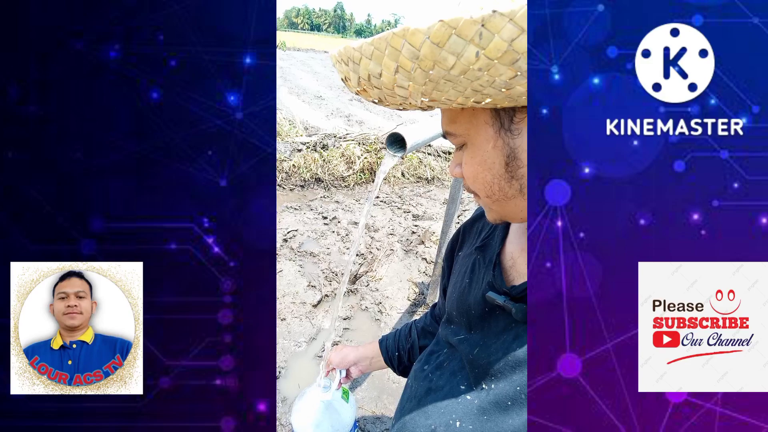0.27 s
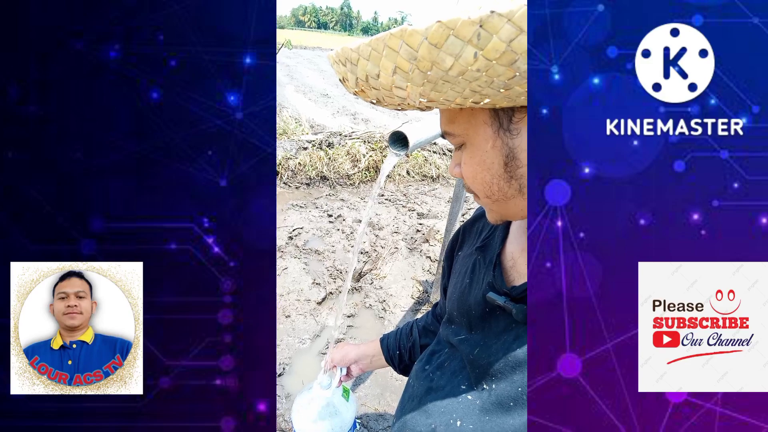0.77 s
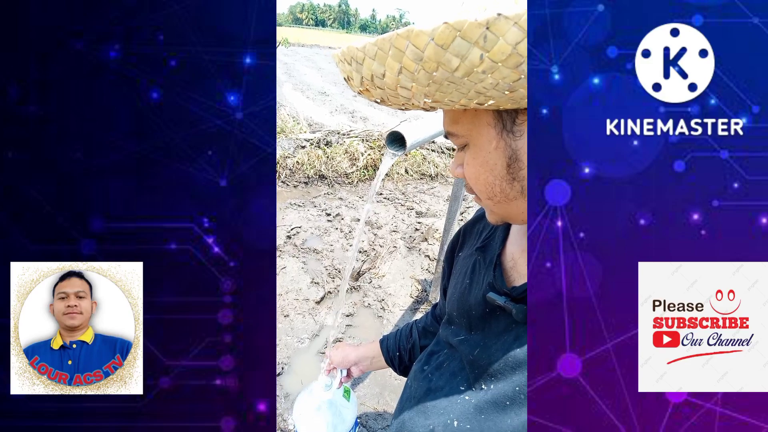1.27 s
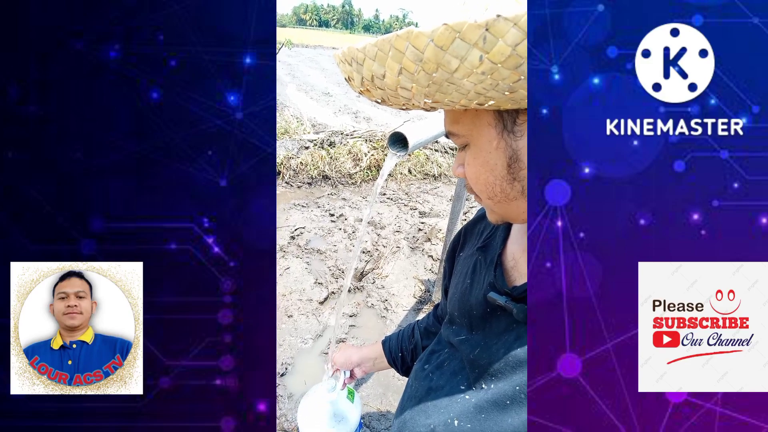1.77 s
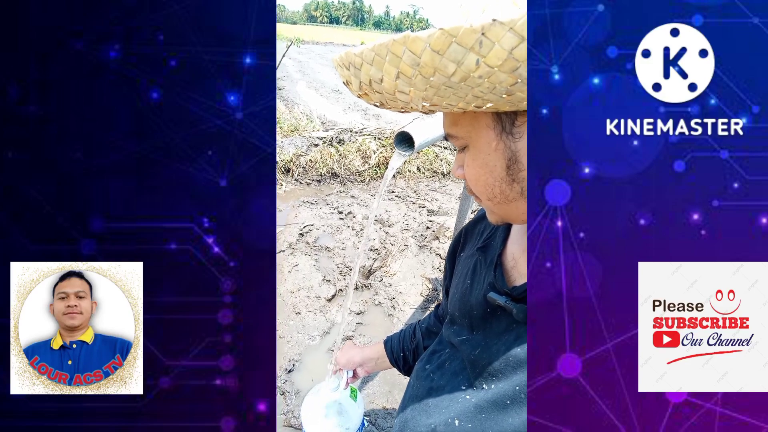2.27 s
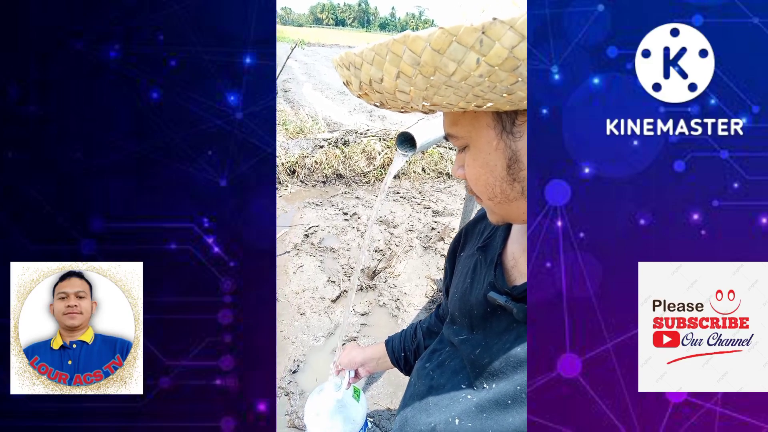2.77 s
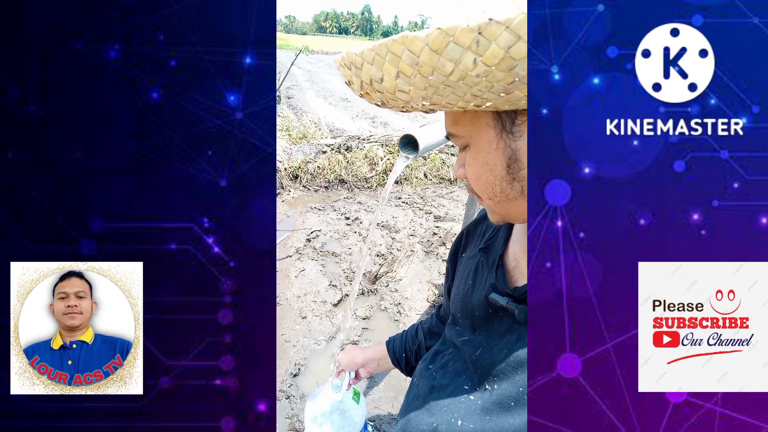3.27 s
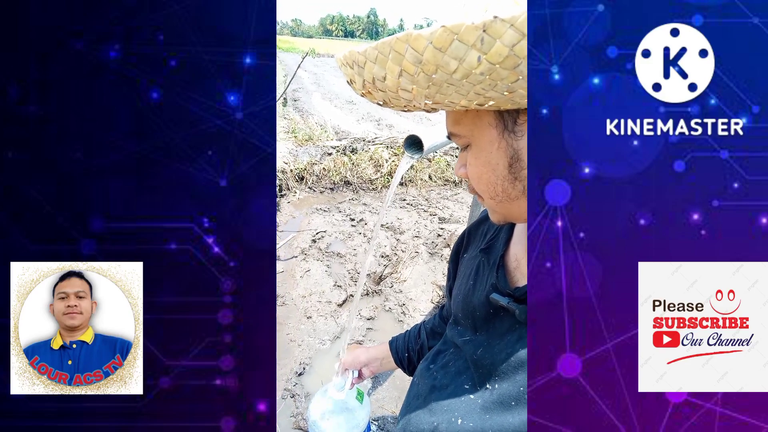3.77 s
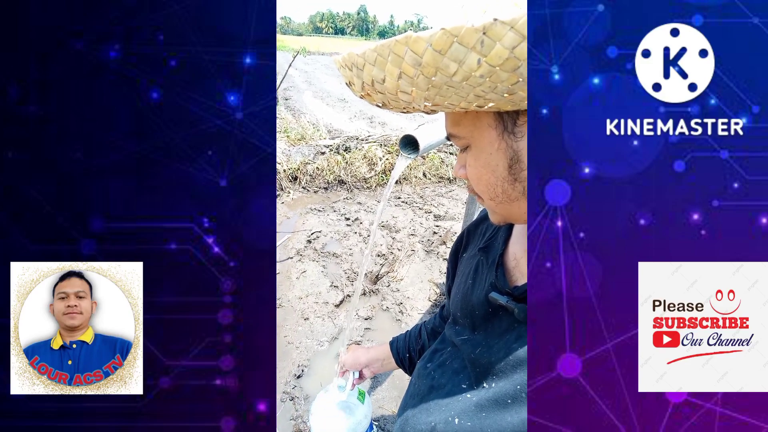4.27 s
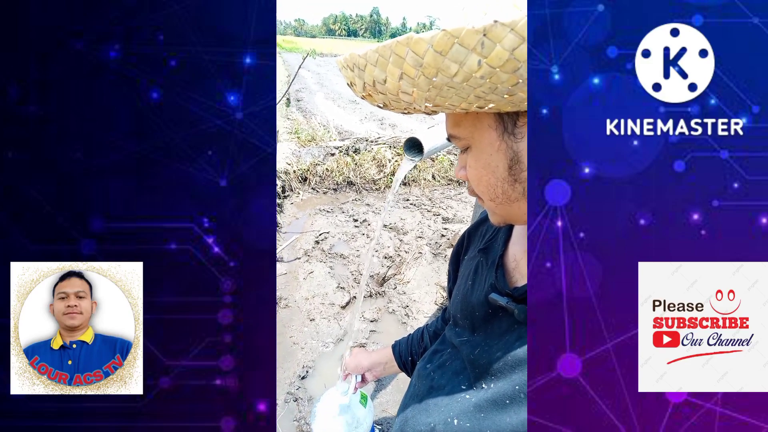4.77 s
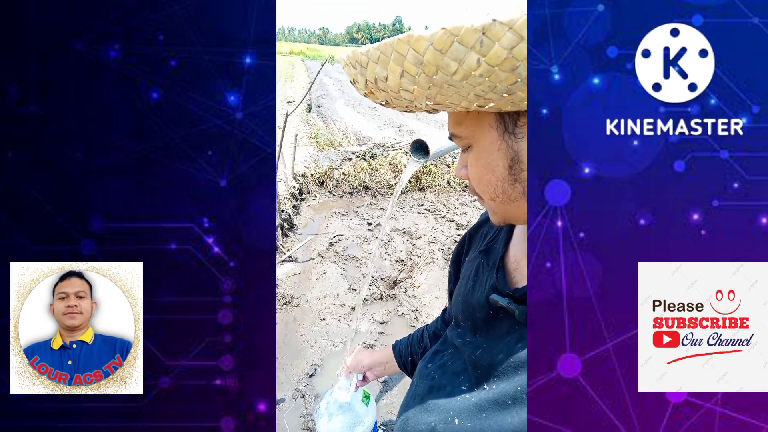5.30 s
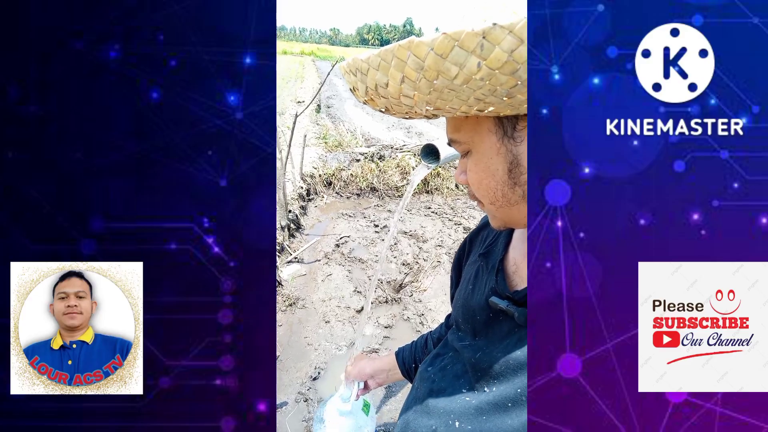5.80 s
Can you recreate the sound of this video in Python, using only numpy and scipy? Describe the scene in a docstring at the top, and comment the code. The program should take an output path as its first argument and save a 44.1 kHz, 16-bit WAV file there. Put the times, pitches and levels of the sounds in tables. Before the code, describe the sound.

Water pours from a pipe into a plastic bottle, gurgling and splashing, while wind gusts thump on the microphone.

```python
"""In an open field, water falls from a pipe into a plastic bottle and spills onto mud.
The stream hisses, gurgles and makes the bottle ring. Air trapped in the water rings as bubbles,
and single drops tick on the plastic. Gusts of wind beat on the phone's microphone opening;
the hardest make the phone turn its level down, and their sharpest peaks are flattened."""
import sys
import numpy as np
from scipy import signal
from scipy.fft import rfft, irfft, next_fast_len
from scipy.io import wavfile
from scipy.ndimage import uniform_filter1d, minimum_filter1d, map_coordinates

SR = 44100
rng = np.random.default_rng(int(sys.argv[2]) if len(sys.argv) > 2 else 0)


def inscribe(sig):
    """Save sig as 16-bit PCM at rate SR to the path in sys.argv[1].

    A 1-D sig is mono; a 2-D sig holds one channel per row.
    Samples are clipped to [-1, 1] before scaling.
    """
    pcm = np.round(np.clip(np.atleast_2d(sig).T, -1, 1) * 32767)
    wavfile.write(sys.argv[1], SR, pcm.astype(np.int16))


N = 266452

# tone of the water's splash, its higher sizzle and its highest, fine spray: f/Hz, level/dB
SPLASH_TONE = [(1800, -20.5), (2200, -4), (2700, 0.5), (3100, -2.5), (3700, 0.5), (4100, -8.5), (4600, -25),
               (6000, -55.5)]
SIZZLE_TONE = [(3500, -41), (4150, -2), (4600, 4), (5500, 5.5), (5900, -16.5), (6500, 5.5), (7200, -15),
               (8000, -10), (9000, -42)]
SPRAY_TONE = [(4000, -21.5), (7000, 4), (8100, -6), (9000, 6), (9500, 5.5), (10100, -1.5), (11000, 0.5),
              (12100, 8.5), (13200, 3.5), (14400, 13.5), (15400, 16.5), (15600, -37), (16500, -16)]
# puffs of wind on the microphone: t/s, hold/s, low rumble/dB, upper rumble/dB, slap pitch/Hz
WIND_PUFFS = [(0.162, 0.0078, -32.5, -65, 97), (1.069, 0.052, -34.5, -30, 228),
              (1.257, 0.016, -22.5, -36, 108), (1.29, 0.062, -23, -47, 96), (1.429, 0.017, -21, -48, 100),
              (1.506, 0.028, -31, -64, 90), (1.703, 0.017, -41, -65, 115), (2.026, 0.016, -29, -58, 167),
              (2.259, 0.0068, -38, -37, 149), (2.455, 0.053, -13, -56, 166),
              (2.544, 0.0073, -10.5, -35.5, 117.6), (2.579, .035, -18, -33, 201),
              (3.854, 0.0037, -23, -61, 106.5), (4.066, 0.02, -24.5, -56, 89),
              (4.195, 0.036, -23.5, -35, 169.4), (4.32, 0.06, -32, -63, 110),
              (4.406, 0.058, -22, -34.5, 99), (4.507, 0.039, -11.5, -21, 98.5),
              (4.699, 0.084, -21, -28.5, 222), (4.799, 0.063, -14, -24.5, 237),
              (4.887, 0.022, -10, -9.5, 343), (4.996, 0.03, -18, -18.5, 303), (5.085, 0.029, -25, -23, 268),
              (5.144, 0.094, -19.5, -16.5, 250), (5.295, 0.04, -38, -13.5, 330),
              (5.418, 0.0091, -26, -19.5, 311), (5.461, 0.05, -17, -19.5, 252),
              (5.578, 0.069, -11.5, -17.5, 201), (5.677, 0.019, -20, -15.5, 124),
              (5.778, 0.0092, -28, -37, 189), (5.922, 0.15, -10.5, -20.5, 161)]


def amp(db):
    """Turn a level in dB into a gain to multiply by."""
    return 10 ** (np.asarray(db) / 20)


def unit(x):
    """Scale x to an average (rms) level of 1."""
    return x / np.sqrt(np.mean(x ** 2) + 1e-20)


def curves(rows):
    """Join a table's points with straight lines: one curve for each column after the time."""
    times, *columns = np.transpose(rows)
    return [np.interp(np.arange(N) / SR, times, column) for column in columns]


def wobble(per_s):
    """A smooth random curve through per_s points a second."""
    points = np.clip(rng.standard_normal(int(N * per_s / SR) + 4), -2, 2)
    return map_coordinates(points, [np.arange(N) * per_s / SR])


def coloured(x, tone):
    """Filter x so that its lows and highs follow a table of f/Hz, level/dB."""
    size = 2 * next_fast_len(N // 2 + 8192)
    hz, db = np.transpose(tone)
    gain = amp(np.interp(np.log(np.fft.rfftfreq(size, 1 / SR) + 1), np.log(hz), db))
    cepstrum = irfft(np.log(gain), size)
    cepstrum[1:size // 2] *= 2  # folded so the filter rings only after a sound, never before
    cepstrum[size // 2 + 1:] = 0
    return irfft(rfft(x, size) * np.exp(rfft(cepstrum)), size)[:N]


def patchy_noise(depth_db):
    """Hiss that grows louder and softer in small patches of time and pitch."""
    spectrum = signal.stft(rng.standard_normal(N), nperseg=512)[2]
    patches = uniform_filter1d(rng.standard_normal(spectrum.shape), size=3, axis=0)
    patches = uniform_filter1d(patches, size=7, axis=1)
    return unit(signal.istft(spectrum * amp(depth_db * unit(patches)), nperseg=512)[1][:N])


def pings(start_s, db, hz, cycles, rise, warble=0):
    """Short fading tones. rise lifts the pitch, as when a bubble nears the surface; warble shakes it."""
    t = np.arange(2048) / SR
    age = t * (hz / cycles)[:, None]  # in lifetimes
    phase = 2 * np.pi * hz[:, None] * t * (1 + rise * np.minimum(age, 3) / 2)
    if warble:
        wander = uniform_filter1d(rng.standard_normal(age.shape), size=128)
        phase += 2 * np.pi * hz[:, None] * np.cumsum(warble * unit(wander), axis=1) / SR
    wave = amp(db)[:, None] * np.sin(phase) * np.exp(-2 * age) * (1 - np.exp(-4.5 * age)) ** 2
    where = np.round(start_s * SR).astype(int)[:, None] + np.arange(len(t))
    return np.bincount(where.ravel(), wave.ravel(), N + len(t))[:N]


def spatter(per_s, loud_db, wet_s):
    """Droplets land at random, each a short wet burst; loud_db sets how far the big ones stand out."""
    size_db = loud_db * np.minimum(rng.exponential(size=N), 3)
    hits = (rng.random(N) < per_s / SR) * amp(size_db)
    age = np.arange(512) / SR / wet_s
    bursts = signal.fftconvolve(hits, age * np.exp(-age))[:N]
    return unit(bursts * rng.standard_normal(N))


def spill():
    """Water that misses the bottle patters evenly on the mud."""
    # tone of the patter: f/Hz, level/dB
    mud_tone = [(290, -30), (500, 15), (980, 5), (1940, -9), (2230, -10.5), (3630, -27), (4130, -24),
                (5460, -29), (8000, -32), (10400, -57), (17600, -120)]
    patter = patchy_noise(depth_db=1.5) + .42 * spatter(per_s=2300, loud_db=6, wet_s=.0013)
    return amp(-55.5) * unit(coloured(patter, mud_tone))


def gusts():
    """Gains of the wind's low and upper rumble: a breeze, plus puffs that rise, hold and fall."""
    # breeze on the microphone: t/s, low rumble/dB, upper rumble/dB
    breeze = [(0, -43, -46), (1.5, -39.5, -47.5), (2.4, -36.5, -48.5), (2.75, -52, -52.5),
              (3.8, -43.5, -48), (4.97, -29.5, -42), (5.02, -18.5, -19), (5.66, -19, -24), (5.74, -46, -39),
              (6.04, -19, -30.5)]
    rise_s, fall_db_per_s = .017, 437
    t, gains = np.arange(N) / SR, amp(curves(breeze))
    for start_s, hold_s, low_db, upper_db, _ in WIND_PUFFS:
        rise = np.clip(1 + (t - start_s) / rise_s, 0, 1) ** 2
        fall = amp(-fall_db_per_s * np.maximum(t - start_s - hold_s, 0))
        gains = np.hypot(gains, amp([[low_db], [upper_db]]) * rise * fall)
    return gains


def slaps():
    """Each puff opens with a slap: a few uneven swings of air pressure that start fast and die away."""
    out, t = np.zeros(N + 4096), np.arange(4096) / SR
    for start_s, _, low_db, upper_db, hz in WIND_PUFFS:
        uneven_t = np.cumsum(1 + .25 * np.repeat(rng.standard_normal(32), 128)) / SR
        swing = np.sin(2 * np.pi * (hz * uneven_t + rng.random()))
        peak_s = .0047 + .49 / hz
        size = amp(5.5) * np.hypot(amp(low_db), amp(upper_db))
        out[round(start_s * SR):][:len(t)] += size * t / peak_s * np.exp(1 - t / peak_s) * swing
    return out[:N]


def wind():
    """Swirls of air beat on the microphone; faster air adds a higher rumble, the fastest a crackle."""
    # tone of the low rumble, the upper rumble and the crackle: f/Hz, level/dB
    low_tone = [(20, -72), (45, -15.5), (75, 1.5), (115, 3.5), (190, -0.5), (260, -9.5), (400, -44),
                (800, -77.5)]
    upper_tone = [(120, -19), (220, 3.5), (300, 4.5), (430, 2), (600, -10), (900, -40.5), (1600, -82)]
    crackle_tone = [(300, -41), (500, -6), (700, -8), (1000, -11.5), (1600, -8), (3000, -66)]
    # sharp snaps of air in the hardest gusts: t/s, level/dB, f/Hz
    air_snaps = [(4.897, 4.5, 510), (5.082, -7, 524), (5.17, 4, 527), (5.19, -4, 806), (5.2, 0, 562),
                 (5.299, 0, 575), (5.327, -3.5, 625), (5.422, -7, 634), (5.652, -8, 605), (5.944, -12, 437)]
    low_gain, upper_gain = gusts()
    crackle_gain = amp(-.5) * upper_gain ** 2.7  # grows much faster than the rumble
    start_s, db, hz = np.transpose(air_snaps)
    snaps = pings(start_s, db, hz, cycles=3.3, rise=0, warble=.095)
    lumps = wobble(28)
    low = unit(amp(3 * lumps) * coloured(patchy_noise(depth_db=2), low_tone))
    upper = unit(amp(3.35 * lumps + .76 * wobble(45)) * coloured(patchy_noise(depth_db=7), upper_tone))
    crackle = unit(amp(7 * wobble(60)) * coloured(rng.standard_normal(N), crackle_tone))
    return low_gain * low + upper_gain * upper + crackle_gain * crackle + slaps() + snaps


def ticks():
    """A drop hits the plastic with a thin, high click and a softer, longer splash."""
    # drops on the plastic: t/s, click/dB, splash/dB
    drops = [(0.0693, -30, -21), (0.277, -35, -9), (1.131, -34, -16), (1.307, -29, -43), (1.5764, -32, -12),
             (1.632, -19, -77), (1.732, -28, -19), (1.9097, -22, -44), (2.0226, -28, -31),
             (2.067, -27.5, -50), (2.151, -29.5, -34), (2.1919, -24, -5.5), (2.21, -41, -9.5),
             (3.0583, -27, -15), (3.099, -27, -52), (3.128, -24, -11), (3.157, -13, -2.5), (3.224, -29, -1),
             (3.527, -26.5, -25), (3.684, -23, -42), (3.76, -25, -4.5), (3.841, -28, -35),
             (3.886, -48, -38), (4.138, -37, -12.5), (4.442, -19.5, -16), (4.701, -47, -14.5),
             (5.324, -31, -7)]
    clicks, splashes, t = np.zeros(N + 2048), np.zeros(N + 2048), np.arange(2048) / SR
    click_tail = .1 * (1 - np.exp(-t / .002)) * amp(-60 * t / .05)
    click_shape = t / .0008 * np.exp(-t / .0008) + click_tail
    splash_shape = .6 * t / .005 * np.exp(-t / .005)
    for start_s, click_db, splash_db in drops:
        tint = rng.standard_normal(10)  # every drop has its own tone
        noise = np.convolve(rng.standard_normal(len(t)), tint / np.linalg.norm(tint))[:len(t)]
        clicks[round(start_s * SR):][:len(t)] += amp(click_db) * click_shape * noise
        splashes[round(start_s * SR):][:len(t)] += amp(splash_db) * splash_shape * noise
    sizzle = amp(-9.5) * coloured(splashes[:N], SIZZLE_TONE)
    return coloured(clicks[:N], SPRAY_TONE) + coloured(splashes[:N], SPLASH_TONE) + sizzle


def plops():
    """Single bubbles ring out above the stream, blurred by echoes inside the bottle."""
    # the loudest bubbles, down to glugs of air leaving the bottle: t/s, level/dB, f/Hz, life/cycles
    loud_bubbles = [(0.002, -9.5, 1740, 7.4), (0.065, -11, 2770, 9.1), (0.077, -6.5, 2760, 6),
                    (0.226, -16.5, 4740, 26), (0.274, -21.5, 3250, 25), (0.3, -10, 1216, 6.3),
                    (0.394, -17, 2150, 10), (0.594, -18, 1990, 16), (0.623, -18, 1920, 20),
                    (0.656, -20, 4960, 21), (0.7752, -20, 1338, 24), (1.013, -25.5, 537, 28),
                    (1.135, -29.5, 2980, 55), (1.2, -31, 3050, 35), (1.615, -21.5, 2540, 20),
                    (1.722, -25, 1410, 14), (1.8363, -15, 1720, 23), (1.947, -24.5, 1060, 32),
                    (1.99, -16, 3615, 19), (2.0667, -19, 2350, 10), (2.0994, -14.5, 6700, 22),
                    (2.1316, -19.5, 3700, 19), (2.197, -16, 2900, 9.4), (2.2163, -19, 1350, 43),
                    (2.4035, -14.5, 3390, 16), (2.5008, -20, 1806, 21), (2.664, -20.5, 1775, 32),
                    (2.6792, -18, 1810, 17), (2.722, -22.5, 1900, 18), (2.727, -21, 665, 12),
                    (2.741, -5.5, 3320, 6.2), (2.769, -25, 646, 13), (2.815, -17, 5370, 14),
                    (2.818, -24.5, 873, 9.3), (2.912, -26, 548, 27), (2.936, -24, 600, 13),
                    (2.937, -24, 1770, 14), (3.013, -21.5, 2950, 35), (3.088, -22, 1262, 25),
                    (3.058, -18, 5380, 22), (3.143, -18, 1004, 22), (3.1557, -12, 1290, 14),
                    (3.189, -17, 1324, 16), (3.199, -21.5, 598, 7.7), (3.212, -16, 1310, 16),
                    (3.265, -31, 1830, 18), (3.267, -28, 1105, 11), (3.422, -25, 1880, 38),
                    (3.589, -8, 1220, 5.7), (3.3698, -11.5, 1370, 15.4), (3.564, -23, 780, 22),
                    (3.5924, -5, 1740, 7.9), (3.694, -17.5, 1303, 13), (3.7554, -21, 2664, 67),
                    (3.861, -18, 2430, 14), (4.048, -25, 493, 21), (4.2004, -24.5, 1780, 20),
                    (4.288, -20.5, 398, 9.9), (4.3652, -11.5, 1350, 23.6), (4.41, -14, 1300, 16),
                    (4.5133, -7, 1153, 8.9), (4.689, -18, 1244, 33), (5.0586, -8, 1525, 5.6),
                    (5.11, -12, 1360, 5.7), (5.132, -20, 995, 14), (5.238, -12.5, 1285, 5.4),
                    (5.258, -22, 1230, 14), (5.385, -24, 1960, 12), (5.3437, -10, 1360, 9.3),
                    (5.456, -17, 1244, 11), (5.6, -33, 1140, 17), (5.7014, -13, 5180, 10.3),
                    (5.729, -25.5, 994, 18), (5.75, -23, 2050, 13), (5.85, -26, 2580, 14),
                    (5.876, -25, 1800, 13), (5.984, -30.5, 1366, 15)]
    start_s, db, hz, cycles = np.transpose(loud_bubbles)
    direct = pings(start_s, db, hz, np.clip(cycles, 2, 60), rise=.028, warble=.067)
    echoes = rng.standard_normal(4096) * amp(-60 * np.arange(4096) / SR / .1)  # fade 60 dB per 0.1 s
    return direct + amp(-3.5) * signal.fftconvolve(direct, echoes / np.linalg.norm(echoes))[:N]


def bubble_swarm(count, centre_hz, spread, cycles, loud_db):
    """Many bubbles ring at random moments around one pitch, a few far louder than the rest."""
    when, pitch, size, life = rng.random((count, 4)).T
    hz = np.clip(centre_hz * (pitch / (1 - pitch)) ** (spread / 2), 300, 16000)
    size_db = loud_db * np.minimum(-np.log(size), 3)
    return unit(pings(when * N / SR, size_db, hz, cycles * (.5 + life), rise=.021))


def bottle_ring(drive, gurgle_db, splash_db, sizzle_db):
    """Each bottle note follows the water near its pitch, on and off as the jet wanders over the neck."""
    # notes of the bottle's air and walls: f/Hz, width/Hz, level/dB
    bottle_notes = [(800, 83, -15), (1348, 120, -9), (1940, 250, -1.5), (2820, 150, -9), (3690, 200, 1.5),
                    (4630, 420, -10.5), (5460, 260, -3), (6080, 180, -9)]
    size = next_fast_len(N + 8192)
    f, spectrum = np.fft.rfftfreq(size, 1 / SR), 0
    for hz, width_hz, db in bottle_notes:
        flow_db = gurgle_db if hz < 2200 else splash_db if hz < 4200 else sizzle_db
        push = rfft(drive * amp(flow_db + 5.2 * wobble(14)), size)
        resonance = 1j * f * width_hz / (hz * hz - f * f + 1j * f * width_hz)
        spectrum = spectrum + amp(db) * push * resonance ** 2
    return irfft(spectrum, size)[:N]


def stream():
    """The falling stream breaks up, so its gurgle, splash, sizzle and spray surge and flicker."""
    # loudness of the stream: t/s, splash/dB, gurgle over splash/dB, sizzle over splash/dB
    flow = [(0, -48.5, 6.5, -5), (.29, -46, 6.5, -1), (.6, -43, -2.5, -16.5), (.81, -51, 5.5, -10),
            (1.02, -51.5, -0.5, -11), (1.23, -56.5, 2, -8.5), (1.58, -48, 4, -17.5),
            (1.85, -52.5, -0.5, 4.5), (2.07, -50, 2.5, -2.5), (2.3, -42.5, 0, -0.5),
            (2.45, -51.5, -4, -15.5), (2.67, -54.5, 5.5, -2), (3.04, -51, 3.5, 0.5), (3.25, -35.5, 5, -5),
            (3.41, -46, -4, -4.5), (3.57, -39.5, -1, -1.5), (3.7, -52, 9, 0.5), (3.84, -40, -9, -5),
            (3.95, -53.5, -1, -7), (4.27, -50, 1, -9), (4.36, -43.5, -3.5, -6.5), (4.5, -51, 1.5, -8.5),
            (4.7, -42, 5, -7), (4.95, -60, -1, 0.5), (5.05, -47.5, 3.5, -6), (5.15, -45.5, 1, -7),
            (5.25, -56.5, 9, 0), (5.39, -40.5, 2, -4), (5.45, -62, 9.5, 0), (5.56, -44.5, 4, -15),
            (5.69, -53.5, -2.5, -11), (5.73, -46, -7, -14), (5.82, -60, 7.5, 4), (5.96, -55, -10, -12.5),
            (6.04, -64, -12, -6.5)]
    # tone of the gurgle in the bottle: f/Hz, level/dB
    gurgle_tone = [(300, -6), (600, -2.5), (1000, -1.5), (1370, 5), (1600, 1), (1860, 9), (2200, -6.5),
                   (3000, -29)]
    splash_db, gurgle_over_db, sizzle_over_db = curves(flow)
    gurgle_db, sizzle_db = splash_db + gurgle_over_db, splash_db + sizzle_over_db
    spray_db = -26 + .49 * splash_db + .12 * sizzle_over_db
    surge_db = .6 * wobble(9) + 1.3 * wobble(25) + 1.8 * wobble(80)
    drops = spatter(per_s=1200, loud_db=7, wet_s=.0007)
    big = bubble_swarm(count=1500, centre_hz=1521.7, spread=.3036, cycles=20, loud_db=6)
    small = bubble_swarm(count=3600, centre_hz=4208, spread=.38, cycles=16.3, loud_db=7)
    tiny = bubble_swarm(count=1500, centre_hz=11000, spread=.3, cycles=7, loud_db=4)

    def layer(db, tone, bubbles_and_drops, patch_db, flicker_db, per_s):
        """Hiss, bubbles and drops in one tone, with the shared surge and a flicker of their own."""
        water = unit(coloured(patchy_noise(patch_db) + bubbles_and_drops, tone))
        return amp(db + surge_db + flicker_db * wobble(per_s)) * water

    gurgle = layer(gurgle_db, gurgle_tone, .5 * big + .7 * drops, patch_db=4, flicker_db=2.5, per_s=14)
    splash = layer(splash_db, SPLASH_TONE, .45 * small + 1.18 * drops,
                   patch_db=10, flicker_db=3.26, per_s=22.227)
    sizzle = layer(sizzle_db, SIZZLE_TONE, .6 * small + .7 * drops, patch_db=7, flicker_db=2.6, per_s=22)
    spray = layer(spray_db, SPRAY_TONE, .4 * tiny + .6 * drops, patch_db=3.5, flicker_db=2.2, per_s=40)
    drive = rng.standard_normal(N) + 1.6 * drops
    ring = amp(9.5 + surge_db) * bottle_ring(drive, gurgle_db, splash_db, sizzle_db)
    return gurgle + splash + sizzle + spray + ring


def scene():
    """Water and wind in one channel; the open field adds no echo."""
    return (stream() + plops() + ticks() + wind() + spill())[None]


def record(dry):
    """The phone drops the deepest bass, turns gusts down, flattens peaks and cuts the highest treble."""
    low_hz, top_hz, limit, clip_level = 46, 16800, .74, .69
    dry = signal.sosfilt(signal.butter(2, low_hz, "high", fs=SR, output="sos"), dry)
    safe_gain = np.minimum(1, limit / (np.abs(dry) + 1e-9))
    limited = dry * uniform_filter1d(minimum_filter1d(safe_gain, size=900), size=800)  # hold, then smooth
    clipped = limited / (1 + np.abs(limited / clip_level) ** 60) ** (1 / 60)
    size = next_fast_len(N + 4096)
    passed = np.fft.rfftfreq(size, 1 / SR) < top_hz
    return irfft(rfft(clipped, size) * passed, size)[..., :N]


dry = scene()
out = record(dry)
inscribe(out)
```